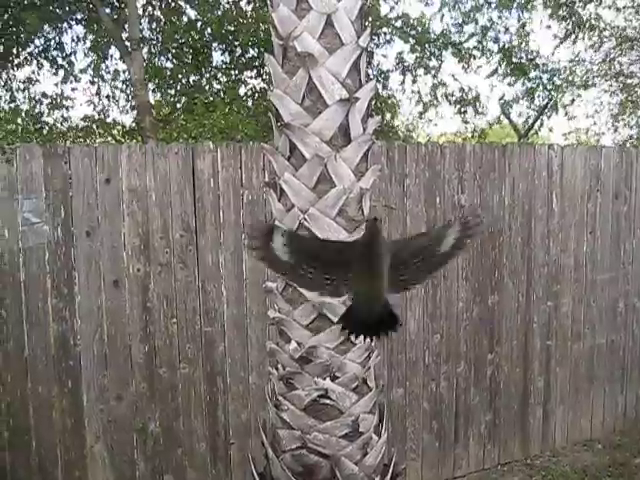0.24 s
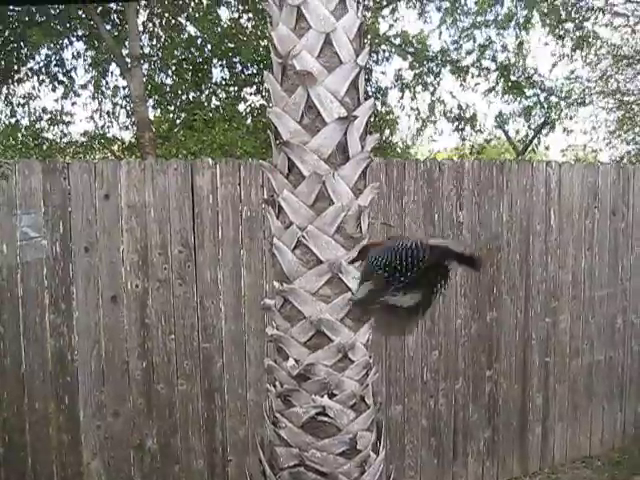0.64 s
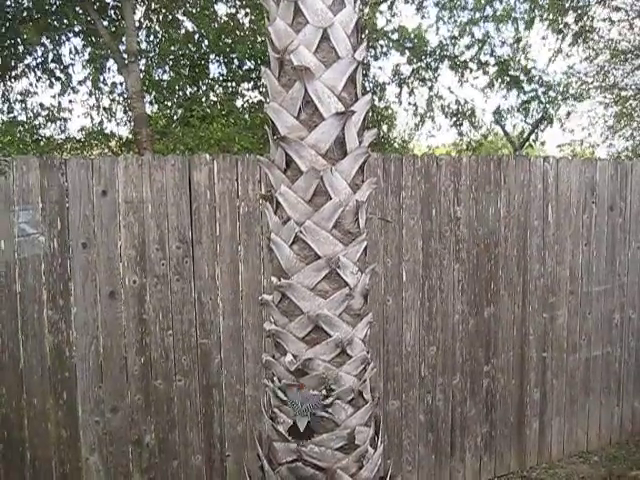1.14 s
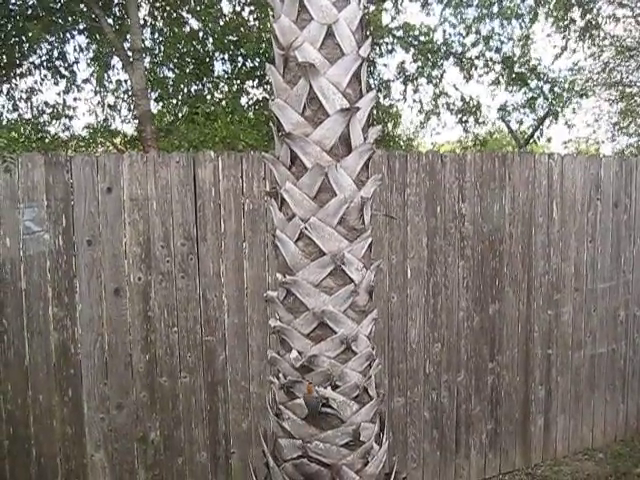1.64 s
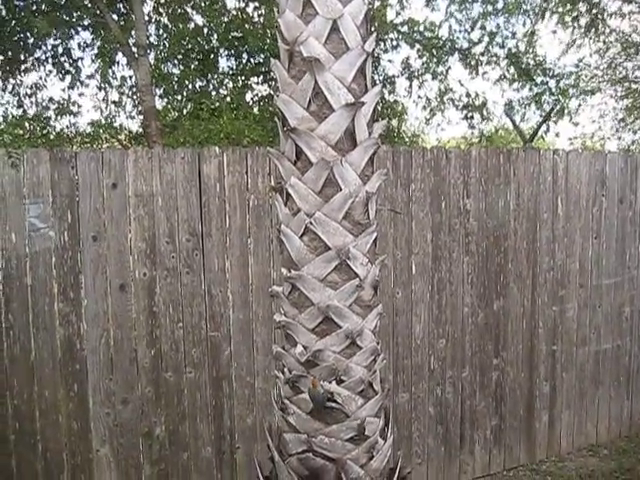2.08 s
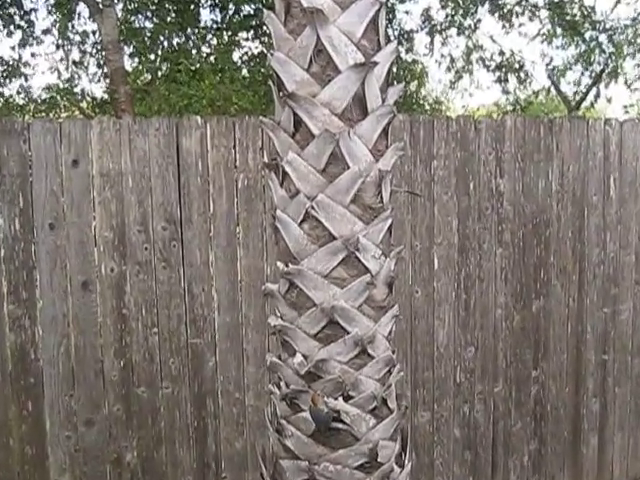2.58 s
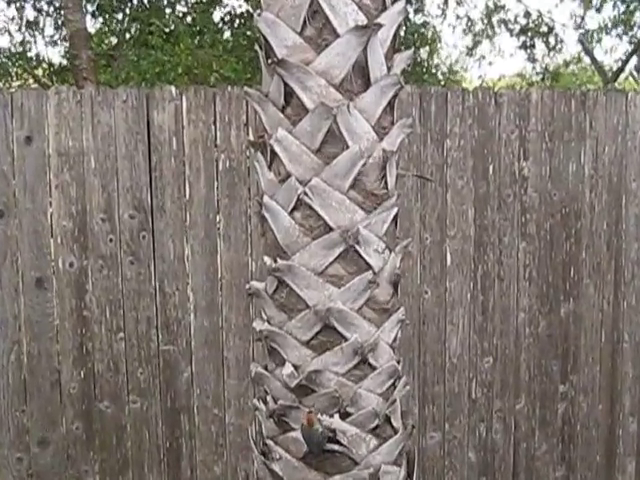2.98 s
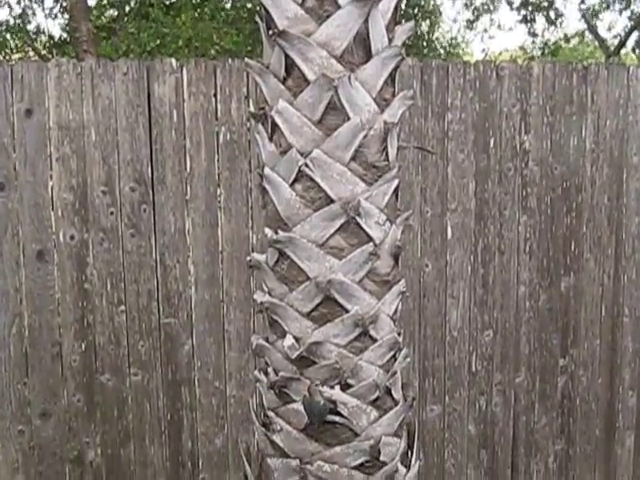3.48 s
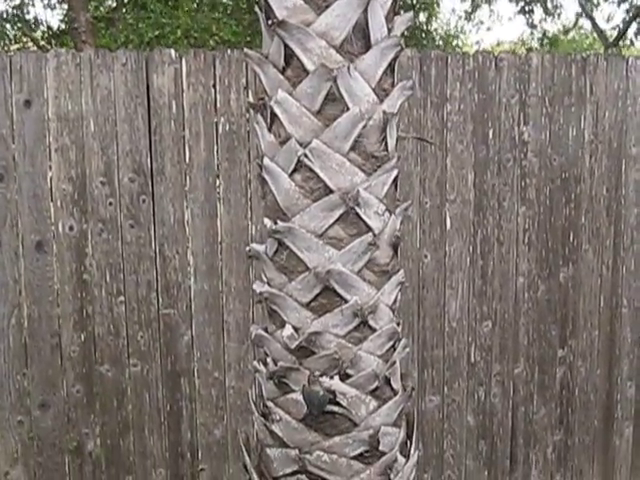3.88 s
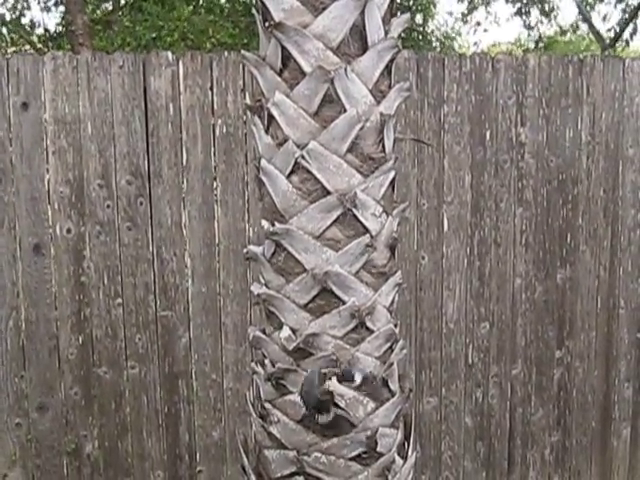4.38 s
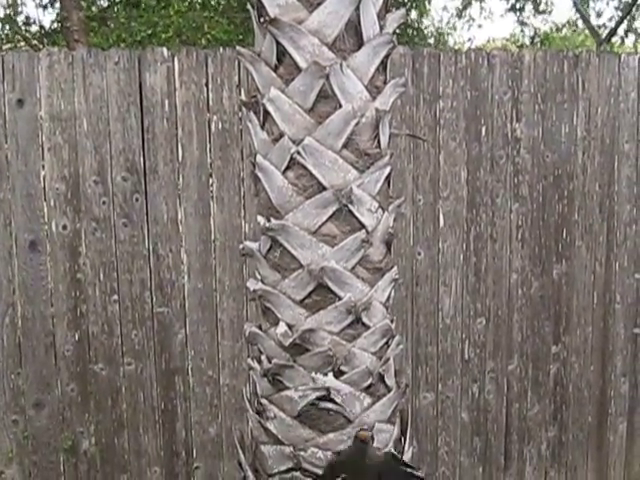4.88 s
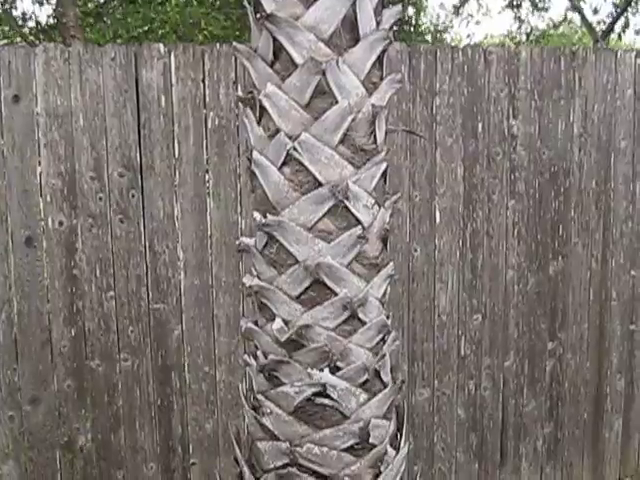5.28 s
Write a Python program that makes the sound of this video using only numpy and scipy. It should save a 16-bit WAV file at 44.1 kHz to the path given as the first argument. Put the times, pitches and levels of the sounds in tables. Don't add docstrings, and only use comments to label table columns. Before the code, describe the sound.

Close handheld microphone indoors: light taps quicken into sharp knocks, claw scrabbling and a heavy bump on a window, with a short room echo. Then a near pause with skin sliding and squeaking faintly on the plastic camera shell, a crack and a fuller snap. Sparse quiet pecks and duller thumps return, ending in a strong knock, over steady motor hum and gentle air noise.

```python
import sys
import numpy as np
from scipy import signal
from scipy.fft import rfft, irfft
from scipy.io import wavfile
from scipy.ndimage import uniform_filter1d

SR = 44100
rng = np.random.default_rng(int(sys.argv[2]) if len(sys.argv) > 2 else 0)


def file_out(sig):
    cols = np.atleast_2d(sig).T
    lim = np.clip(cols, -1, 1)
    pcm = np.round(lim * 32767).astype(np.int16)
    wavfile.write(sys.argv[1], SR, pcm)


def makeup_ratio(level_db):
    decades = np.asarray(level_db, float) / 20
    return 10 ** decades


N = 243873

# (time [s], 2.5-11 kHz level [dB], thud level [dB], body level [dB], top level [dB], 60 dB
# fall time [s])
TAPS = [(0.0024, -44.5, -64, -58, -49, 0.18), (0.0544, -47, -60, -39.5, -54, 0.061),
        (0.2154, -49, -59, -51, -37, 0.075), (0.3496, -24, -40, -35, -22, 0.07),
        (0.391, -41, -56, -38.5, -52, 0.062), (0.4708, -30, -45, -46, -35, 0.084),
        (0.4994, -43.5, -55, -48, -52, 0.14), (0.8131, -24, -35, -38, -42, 0.063),
        (0.9287, -14, -31, -23, -7.5, 0.14), (1.1618, -32.5, -65, -41.5, -34, 0.12),
        (2.9796, -45, -64, -60, -60, 0.064), (3.0544, -48, -54, -57, -57, 0.086),
        (3.277, -40, -50, -46, -50, 0.069), (3.5006, -42.5, -50, -50, -39.5, 0.09),
        (3.705, -44.5, -60, -48, -55, 0.077), (4.0869, -38.5, -56, -55, -45, 0.13),
        (5.0768, -34, -51, -39.5, -45, 0.16), (5.3936, -21, -33, -26.5, -37, 0.11)]
SCRABBLES = [
    (0.7989, -30.5, -53, -48, -37, 0.21),
    (0.8128, -26.5, -45, -37.5, -33, 0.13),
    (0.8484, -39, -44.5, -37, -29, 0.22),
    (0.8619, -25.5, -47, -53, -32, 0.16),
    (0.8894, -33.5, -43.5, -48, -32, 0.25),
]
# (time [s], 1.7-3.7 kHz level [dB], 280-530 Hz level [dB], 500-1000 Hz level
# [dB], 1-2.15 kHz level [dB], 60 dB fall time [s])
BODY_BLOWS = [(0.3519, -30, -44, -37, -33, 0.091), (0.6422, -41, -30.5, -26, -25.5, 0.14),
              (0.6981, -56, -50, -62, -48, 0.053), (0.9283, -16, -28.5, -16.5, -15, 0.093),
              (0.9564, -31, -44, -37, -32, 0.2), (0.9894, -35, -33, -29.5, -23.5, 0.16),
              (3.5521, -33.5, -48, -37, -26, 0.1), (4.8394, -49, -44.5, -38.5, -46, 0.2),
              (5.3941, -20, -27.5, -18.5, -37, 0.15)]
# (time [s], level [dB])
PANE_RINGS = [
    (.862, -40),
    (.930, -21),
    (5.394, -31),
]
# (time [s], level [dB], pitch [Hz], width [Hz], 60 dB fall time [s])
FRAME_BUZZES = [(.348, -32.5, 600, 133, 0.074), (.348, -28, 1080, 95, 0.048), (.355, -43, 206, 66, 0.21),
                (.469, -27, 3640, 860, 0.041), (.505, -45, 2900, 600, 0.1), (.861, -31, 9200, 230, 0.17),
                (0.57, -50.5, 136, 90, 0.36), (0.79, -45.5, 166, 96, 0.22), (.94, -48.5, 120, 80, .4),
                (.93, -27.5, 14000, 1600, 0.086), (3.551, -26, 2020, 440, 0.054),
                (3.553, -34.5, 940, 400, 0.17), (3.551, -46.5, 4200, 340, .12),
                (4.086, -44, 4800, 1370, 0.13)]
# (low edge [Hz], high edge [Hz])
TAP_BANDS = [
    (2480, 11100),
    (317, 1160),
    (853, 1810),
    (7860, 13300),
]
# (low edge [Hz], high edge [Hz])
BLOW_BANDS = [(1710, 3700), (282, 533), (507, 1005), (1020, 2150)]
BAND_HOLD = [0.62, 1.46, 0.96, 0.3]
# (pitch [Hz], level [dB], 60 dB fall time [s])
PANE_MODES = [(438, -6, .3), (544, -12, .25), (610, -6, .15), (770, -6, .25), (1066, -14, .2),
              (1222, -12, .08), (1647, -18, .2), (2169, -15, .16), (2439, -20, .25), (2616, -21, .25),
              (3640, -15, .18), (4011, -20, .2), (4665, -16, .15), (4974, -4, .14), (5631, -14, .15),
              (6788, -8, .13), (7117, -4, .18), (8705, -9, .2), (9183, -12, .08), (9523, -5, .09),
              (10420, -13, .1), (11306, -12, .12), (12092, -9, .12), (12900, -17, .08)]
# (time [s], level [dB], crack level [dB], rattle level [dB], rise time [s])
TICKS = [
    (2.7244, -17, -17, -37, 0.00076),
    (3.3308, -8, -30, -31, 0.00067),
]
# (pitch [Hz], level [dB], 60 dB fall time [s])
SHELL_MODES = [
    [(987, -5, 0.026), (1356, -4, 0.027), (1900, 4, 0.013), (2460, -1, 0.012), (3800, 2.5, 0.0083),
     (6500, -12, .012), (9500, -20, 0.01), (13800, -8, 0.014), (15400, -13, 0.013)],
    [(1060, -4.5, 0.024), (1374, -0.5, 0.018), (1670, -1, 0.0089), (3340, -31, .04), (4200, -23, 0.025),
     (6100, -23, 0.01), (10370, -22, 0.0087), (11300, -32, 0.033)],
]
# (time [s], level [dB])
RUB_STROKES = [
    [(1.92, -67), (1.932, -79), (1.938, -64), (2.032, -52), (2.042, -60.5), (2.196, -51.5), (2.23, -69)],
    [(2.46, -65), (2.548, -56.5), (2.622, -74), (2.698, -59), (2.714, -55), (2.726, -35), (2.73, -45)],
    [(3.38, -64), (3.384, -63), (3.392, -79), (3.426, -64), (3.49, -62)],
]
# (pitch [Hz], width [Hz], level [dB])
RUB_MODES = [(1140, 570, 3), (1840, 410, 2), (3000, 1350, -4.5), (4400, 800, -3), (6700, 960, -0.5),
             (10100, 3800, 2.5), (12160, 1400, -7)]
# (time [s], level [dB], ring pitch [Hz])
SLIPS = [(1.941, -40, 1880), (1.9639, -41, 2030), (2.0322, -34.5, 1920), (2.0993, -40, 1940),
         (2.1231, -42, 1846), (2.1841, -38, 1910), (2.1956, -39.5, 1180), (2.5584, -39, 1930)]
# (time [s], pitch [Hz], level [dB])
HUM = [(0, 240.8, -54), (.3, 242.1, -56.5), (1.2, 242, -56), (3, 239.5, -55), (5.53, 238.6, -55.5)]
# (pitch [Hz], width [Hz], level [dB])
WHINES = [(270.5, 3.5, -70), (768.5, 10, -60.5), (810.3, 13.2, -60), (15735, 4, -83)]
# (pitch [Hz], level [dB per Hz])
AIR_COLOUR = [(12, -42), (20, -13.5), (150, -17.5), (210, -13), (300, -12), (554, -12.5), (797, -12),
              (1320, -14.5), (2500, -19.5), (6470, -27), (9040, -27.5), (12300, -32.5), (14500, -37),
              (15800, -47.5)]


def band(x, lo_hz, hi_hz):
    edges = [lo_hz, min(hi_hz, 0.45 * SR)]
    return signal.sosfilt(signal.butter(3, edges, "bandpass", fs=SR, output="sos"), x)


def unit(x):
    return x / np.sqrt(np.mean(x ** 2))


def noise_band(count, hz, width_hz):
    return unit(band(rng.standard_normal(count), hz - width_hz / 2, hz + width_hz / 2))


def clock(seconds):
    return np.arange(int(seconds * SR)) / SR


def fade(t, t60):
    return np.exp(-np.log(1000) * t / t60)


def onset(t, rise_s):
    return 1 - np.exp(-(t / rise_s) ** 2)


def ring(modes, seconds, scatter_db):
    t = clock(seconds)
    out = np.zeros(len(t))
    for hz, db, t60 in modes:
        side, luck = rng.standard_normal(2)
        level = np.sign(side) * makeup_ratio(db + scatter_db * luck)
        out += level * fade(t, np.clip(t60, 0.01, 0.35)) * np.sin(2 * np.pi * hz * t)
    return out


def add(track, s, sound):
    i = int(max(s, 0) * SR)
    track[i:i + len(sound)] += sound[:N - i]


def walk(rate):
    k = int(SR / rate)
    steps = np.repeat(rng.standard_normal(N // k + 1), k)
    return 1.3 * uniform_filter1d(uniform_filter1d(steps, k), k)[:N]


def contacts(rows, bands, rise_s):
    out, t = np.zeros(N), clock(1 / 3)
    for s, *levels_db, t60 in rows:
        grit_db = 3.5 * np.repeat(rng.standard_normal(len(t) // 50), 50)
        push = rng.standard_normal(len(t)) * makeup_ratio(grit_db)
        blow = np.zeros(len(t))
        for db, edges, hold in zip(levels_db, bands, BAND_HOLD):
            blow += makeup_ratio(db) * unit(band(push, *edges)) * fade(t, max(t60, 0.01) * hold)
        add(out, s - rise_s, blow * onset(t, rise_s))
    return out


def frame_buzzes(rise_s):
    out, t = np.zeros(N), clock(1 / 3)
    for s, db, hz, width_hz, t60 in FRAME_BUZZES:
        buzz = noise_band(len(t), hz, width_hz)
        add(out, s - rise_s, makeup_ratio(db) * buzz * fade(t, t60) * onset(t, rise_s))
    return out


def pane_ringing(rise_s):
    out, t = np.zeros(N), clock(1 / 3)
    for s, db in PANE_RINGS:
        add(out, s, makeup_ratio(db) * ring(PANE_MODES, 1 / 3, 1.5) * onset(t, rise_s))
    return out


def room_answer(sound):
    t = clock(0.5)
    tail = band(rng.standard_normal(len(t)), 130, 14300)
    tail *= fade(t, 0.2) * onset(t, 0.0055)
    tail /= np.sqrt(np.sum(tail ** 2))
    return makeup_ratio(-12) * signal.fftconvolve(sound, tail)[:N]


def woodpecker_at_window():
    rise_s, blow_rise_s = 0.002, 0.004
    hits = contacts(TAPS + SCRABBLES, TAP_BANDS, rise_s)
    hits += contacts(BODY_BLOWS, BLOW_BANDS, blow_rise_s)
    hits += frame_buzzes(rise_s)
    return pane_ringing(rise_s) + hits + room_answer(hits)


def shell_ticks():
    out, t = np.zeros(N), clock(1 / 20)
    for (s, db, crack_db, rattle_db, rise_s), modes in zip(TICKS, SHELL_MODES):
        hiss = unit(band(rng.standard_normal(len(t)), 2500, 15500))
        tones = makeup_ratio(db) * ring(modes, 1 / 20, 0)
        crack = makeup_ratio(crack_db) * fade(t, 0.0076)
        rattle = makeup_ratio(rattle_db) * fade(t, 0.02)
        snap = onset(t, rise_s) * (tones + hiss * (crack + rattle))
        add(out, s, band(snap, 700, 13000))
    return out


def finger_rubs():
    t, gain = np.arange(N) / SR, np.zeros(N)
    for stroke in RUB_STROKES:
        s, db = np.transpose(stroke)
        edge_fade = np.clip(np.minimum(t - s[0], s[-1] - t) / 0.016, 0, 1)
        gain += makeup_ratio(np.interp(t, s, db)) * edge_fade
    spikes_db = 2.5 * np.minimum(rng.exponential(size=N), 6)
    grains = rng.standard_normal(N) * makeup_ratio(spikes_db + 3.5 * walk(60))
    coloured = np.zeros(N)
    for hz, width_hz, db in RUB_MODES:
        coloured += makeup_ratio(db) * unit(band(grains, hz - width_hz / 2, hz + width_hz / 2))
    return gain * coloured


def skin_slips():
    out = np.zeros(N)
    for s, db, hz in SLIPS:
        modes = [(hz, 0, 0.03), (2.2 * hz, -6, 0.015), (5.4 * hz, -11, 0.012)]  # (Hz, dB, fall s)
        add(out, s, makeup_ratio(db + 2.5) * ring(modes, 0.04, 1.5))
    return out


def appliance():
    s, hz, db = np.transpose(HUM)
    t = np.arange(N) / SR
    turns = np.cumsum(np.interp(t, s, hz)) / SR
    level = makeup_ratio(np.interp(t, s, db) + 0.4 * walk(17))
    out = np.sqrt(2) * level * np.sin(2 * np.pi * turns)
    for whine_hz, width_hz, whine_db in WHINES:
        out += makeup_ratio(whine_db) * noise_band(N, whine_hz, width_hz)
    return out


def room_air():
    hz, db = np.transpose(AIR_COLOUR)
    f = np.maximum(np.arange(N // 2 + 1) * SR / N, 1)
    colour = makeup_ratio(np.interp(np.log(f), np.log(hz), db))
    low = 1 / (1 + (f / 1500) ** 2)
    bass = irfft(rfft(rng.standard_normal(N)) * colour * np.sqrt(low), N)
    treble = irfft(rfft(rng.standard_normal(N)) * colour * np.sqrt(1 - low), N)
    return makeup_ratio(-49) * unit(bass * makeup_ratio(0.6 * walk(3)) + treble * makeup_ratio(0.4 * walk(2.5)))


def scene():
    camera_handling = shell_ticks() + finger_rubs() + skin_slips()
    return (woodpecker_at_window() + camera_handling + appliance() + room_air())[None]


def low_pass(x):
    return signal.sosfilt(signal.butter(12, 16630, fs=SR, output="sos"), x)


def record(dry):
    port_hz, port_width_hz = 7900, 2500
    b, a = signal.iirnotch(port_hz, port_hz / port_width_hz, SR)
    mix = signal.lfilter(b, a, dry)
    return low_pass(mix)


dry = scene()
out = record(dry)
file_out(out)
```